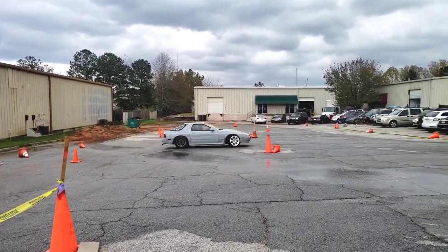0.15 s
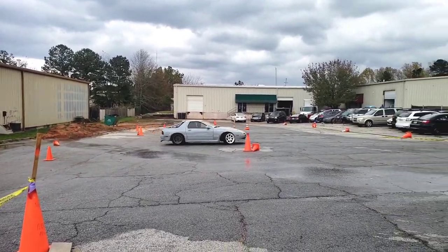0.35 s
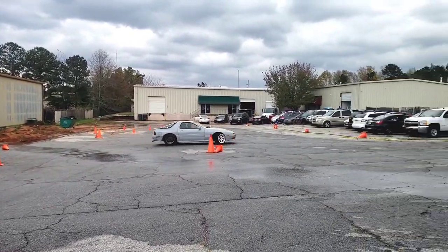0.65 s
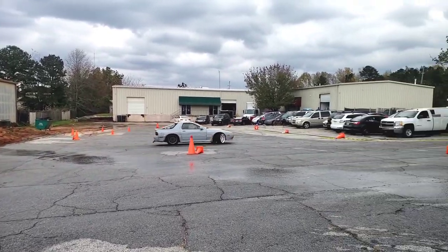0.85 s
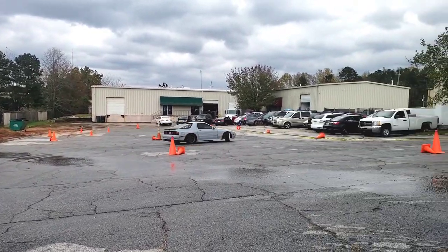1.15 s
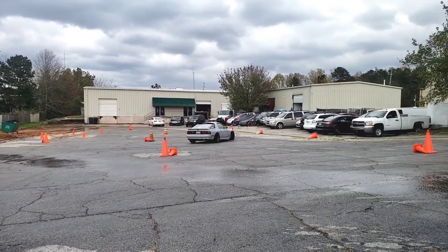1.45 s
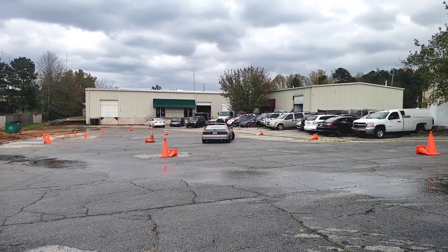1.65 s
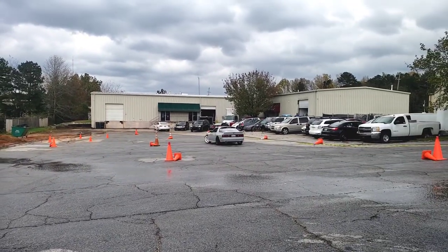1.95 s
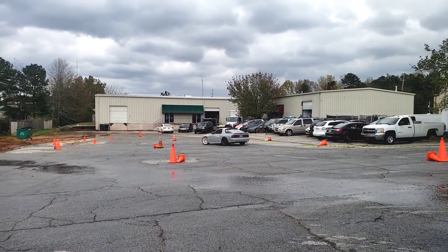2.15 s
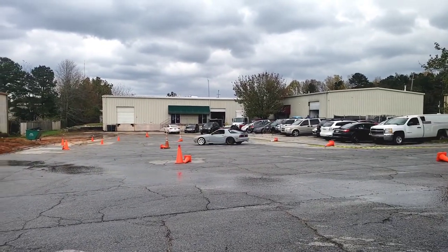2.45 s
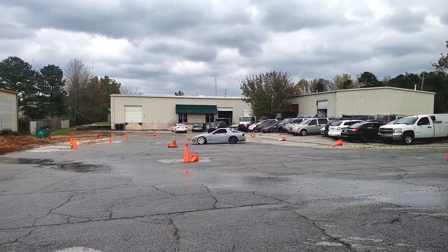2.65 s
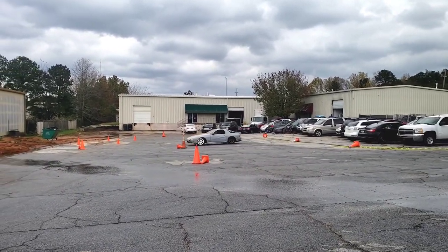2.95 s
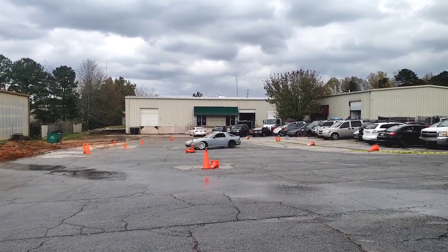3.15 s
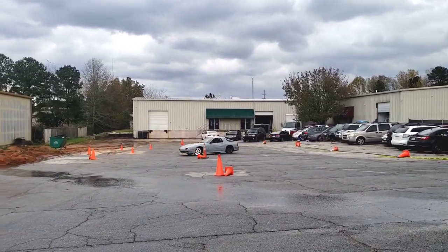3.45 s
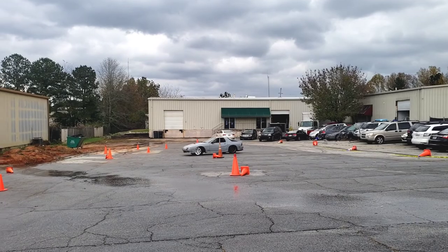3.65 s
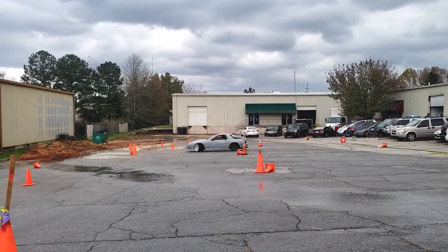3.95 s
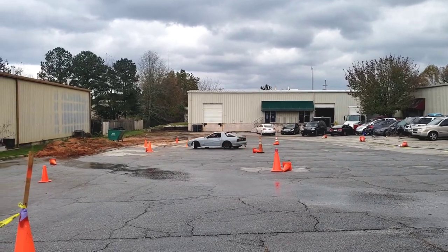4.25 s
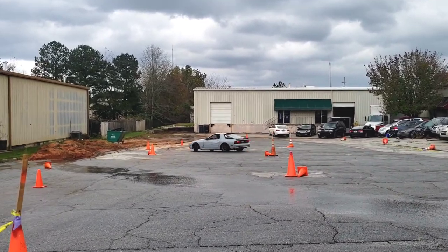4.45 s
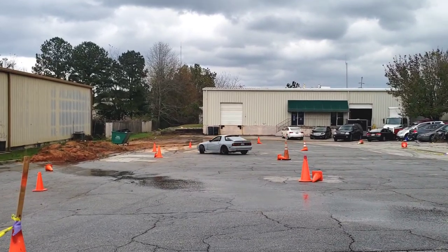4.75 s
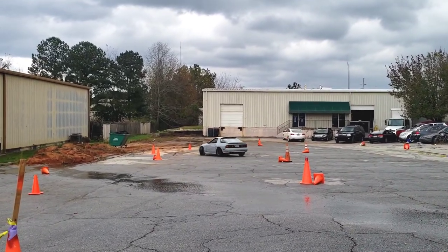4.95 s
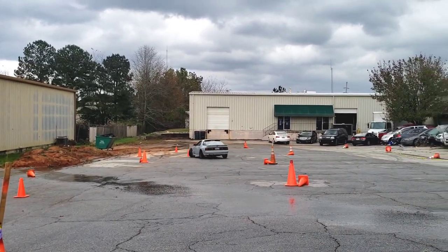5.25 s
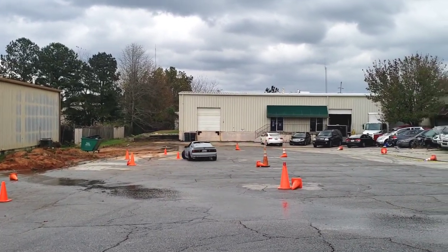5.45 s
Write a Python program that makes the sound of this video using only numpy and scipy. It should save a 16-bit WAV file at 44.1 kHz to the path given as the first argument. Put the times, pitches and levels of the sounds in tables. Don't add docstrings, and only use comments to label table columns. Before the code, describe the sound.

A rotary-engined car drifts around a damp lot, its buzzy, booming exhaust barking and dropping in pitch with each throttle stab, echoing off sheds.

```python
import sys
import numpy as np
from scipy import signal
from scipy.fft import rfft, irfft
from scipy.io import wavfile
from scipy.ndimage import uniform_filter1d

SR = 44100
rng = np.random.default_rng(int(sys.argv[2]) if len(sys.argv) > 2 else 0)


def pcm_store(signal):
    levels = np.round(np.clip(np.atleast_2d(signal), -1, 1) * 32767)
    wavfile.write(sys.argv[1], SR, levels.astype(np.int16).T)


def voltage_ratio(level):
    return 10 ** (np.asarray(level, float) / 20)


N = 246959
LEFT_RIGHT = np.array([[1], [-1]])


def in_time(rows):
    s, *columns = np.transpose(rows)
    return [np.interp(np.arange(N) / SR, s, c) for c in columns]


def at_hz(points):
    hz, value = np.transpose(points)
    return np.interp(np.log(np.fft.rfftfreq(N, 1 / SR) + 1), np.log(hz + 1), value)


def evened(x, span_s=0.0572):
    power = uniform_filter1d(np.mean(np.atleast_2d(x) ** 2, axis=0), int(span_s * SR))
    return x / np.sqrt(np.maximum(power, 0) + 1e-12)


def cut(x, hz, kind, order=2):
    sos = signal.butter(order, np.clip(hz, 10, .45 * SR), kind, fs=SR, output="sos")
    return signal.sosfilt(sos, x)


def resonate(x, modes):
    out = 0
    for k, (hz, width_hz, db) in enumerate(modes):
        r = np.exp(-np.pi * width_hz / SR)
        poles = [1, -2 * r * np.cos(2 * np.pi * hz / SR), r * r]
        zeros = [(1 - r * r) / 2, 0, (r * r - 1) / 2]
        out = out + (-1) ** k * voltage_ratio(db) * signal.lfilter(zeros, poles, x)
    return out


def delayed(x, s):
    return np.interp(np.arange(N) - s * SR, np.arange(N), x)


# f/Hz, likeness/0-1
PORT_LIKENESS = [(100, 0.22), (640, 0.42), (1400, 0.31), (3000, 0.11), (7000, 0.083), (15000, 0.083)]


def stereo_noise(spectrum):
    mid, side = rfft(rng.standard_normal((2, N))) * voltage_ratio(at_hz(spectrum))
    alike = np.clip(at_hz(PORT_LIKENESS), 0, 1)
    x = irfft(np.sqrt(1 + alike) * mid + np.sqrt(1 - alike) * side * LEFT_RIGHT, N)
    return x / np.sqrt(np.mean(x ** 2))


# t/s, level/dB
BREEZE_DB = [
    (0, -76),
    (2.9, -64),
    (3.3, -54),
    (3.8, -52),
    (4.55, -51),
    (5.1, -56),
    (5.6, -36),
]


def wind():
    mid, side = cut(cut(rng.standard_normal((2, N)), 55, "low", order=4), 30, "high")
    return voltage_ratio(in_time(BREEZE_DB)[0]) * evened(mid + 0.67 * side * LEFT_RIGHT, 0.45)


# open t/s, held/s, boom level/dB at 100 firings per s,
# bark level/dB on opening, bark level/dB on shutting
PEDAL_STABS = [
    (0.171, 0.25, -23.5, -28.5, -26.5),
    (0.622, 0.52, -25, -42.5, -24.5),
    (1.636, 0.508, -17.5, -22.5, -26.5),
    (2.274, 0.28, -18.5, -22.5, -25),
    (3.247, 0.627, -18, -42, -25.5),
    (3.93, 0.041, -21.5, -65, -31.5),
    (4.77, .22, -22.5, -58, -44.5),
    (5.199, 0.55, -16.5, -42.5, -31),
]
BOOM_SHUT_S, BARK_SHUT_S, COAST_DULLS_S = 0.039, .07, 0.2


def pedal(shut_s):
    open_s = .012
    t = np.arange(N) / SR
    loads = []
    for on, held, *_ in PEDAL_STABS:
        opening = (t - on) / open_s
        release = 1 - (t - on - held) / shut_s
        loads.append(np.clip(np.minimum(opening, release), 0, 1))
    return np.array(loads)


# f/Hz, level/dB per Hz
YARD_SPECTRUM = [(150, -47), (300, -18), (470, -16.5), (850, -12), (1500, -15.5), (2610, -16.5),
                 (2910, -29.5), (3820, -24.5), (6210, -34), (7310, -27), (9000, -34.5), (14800, -35.5),
                 (16000, -38)]
# t/s, level/dB
TYRE_DB = [
    (0, -39),
    (1.1, -40.5),
    (1.6, -42),
    (3.1, -46),
    (3.7, -50),
    (4.4, -42.5),
    (4.9, -50),
    (5.6, -49.5),
]
# t/s, level/dB, length/s
GRIT_SCUFFS = [
    (4.165, -43.5, 0.02),
    (4.225, -47, 0.0091),
]
# t/s, level/dB
SQUEAL_DB = [
    (2.85, -44),
    (2.95, -44),
    (3.08, -39),
    (3.2, -41.5),
    (3.3, -48),
    (4.2, -48),
    (4.55, -82),
]
# f/Hz, width/Hz, level/dB
TREAD_MODES = [(815, 140, -2), (1590, 470, -7.5)]


def tyres():
    spin_db, flutter_db = 4.5, 1.6
    flutter = cut(rng.standard_normal(N), 12.2, "low")
    spin = uniform_filter1d(pedal(BARK_SHUT_S).max(axis=0), SR // 10)
    level_db = in_time(TYRE_DB)[0] + spin_db * spin + flutter_db * flutter / flutter.std()
    hiss = stereo_noise(YARD_SPECTRUM) * voltage_ratio(level_db)
    t = np.arange(N) / SR
    grit = cut(rng.standard_normal((2, N)) ** 3 / 4, [900, 7000], "band", order=1)
    scuffs = sum(voltage_ratio(db) * np.exp(-((t - s) / length_s - 1) ** 2) for s, db, length_s in GRIT_SCUFFS)
    squeal = voltage_ratio(in_time(SQUEAL_DB)[0]) * evened(resonate(rng.standard_normal(N), TREAD_MODES))
    return hiss + grit * scuffs + squeal


def firings(firing_hz, lag, jitter, mismatch_db, spread_db):
    phase = np.cumsum(firing_hz) / SR
    count = np.arange(1, int(phase[-1]))
    chance = rng.standard_normal((2000, 2))[:len(count)]
    at = np.interp(count, phase, np.arange(N))
    i, second = at.astype(int), count % 2
    late_turns = lag[i] * second + jitter[i] * chance[:, 0]
    at = np.clip(at + late_turns * 2 * SR / firing_hz[i], 0, N - 2)
    size = voltage_ratio(-mismatch_db[i] * second + spread_db * chance[:, 1])
    i = at.astype(int)
    return np.bincount(i, size * (1 - at + i), N) + np.bincount(i + 1, size * (at - i), N) + 1e-18


# f/Hz, width/Hz, level/dB
PIPE_MODES = [(94.8, 84.3, 33), (326, 140, -23)]
SILENCER_MODES = [(780, 83, 11), (893, 34, 1.5)]
# t/s, shaft turns per s, level/dB
LATE_REV_TRACK = [
    (0, 68, -26),
    (.12, 90.5, -35),
    (.25, 77, -30),
    (.32, 120, -40),
    (.4, 69, -89),
]


def late_rev():
    shaft_hz, level_db = in_time(LATE_REV_TRACK)
    pulses = firings(2 * shaft_hz, np.full(N, .01), np.full(N, .006), np.ones(N), spread_db=1.5)
    dull = resonate(pulses, PIPE_MODES) + 0.11 * resonate(pulses, SILENCER_MODES)
    return voltage_ratio(level_db) * evened(dull)


# t/s, exhaust aimed at sheds level/dB, sharp edge aimed at listener level/dB,
# deep silencer ring level/dB
CAR_AIM = [(0, 8.5, 16, 4), (.35, -6, 4.5, -43), (.75, 1.5, 6, -22), (1.08, 2, 13.5, -16),
           (1.4, -1.5, -41, -23), (1.65, 4.5, -10, -3), (1.76, -3, 3.5, -8.5), (2.1, -5, -17, 0),
           (2.35, -9.5, 2.5, -1), (2.9, -3, 14.5, -54), (3.27, 5.5, 8.5, 9), (3.5, 1, -14, 32),
           (3.74, -0.5, 5, -3), (3.88, -4, 4, -27), (4.25, -2, -32, -20), (4.65, 5, -22, -1),
           (4.9, 2.5, -25, 35), (5.15, 7.5, -32, 44), (5.6, 1.5, -40, 35)]
# delay/s, level/dB, left-right/dB
LONG_SHED = (.272, -10, 2)
# delay/s, level/dB, left-right/dB
SHED_WALLS = [(0.084, -18, 1.5), (0.163, -19.5, -16), (0.389, -21, -10.5), (0.552, -21, 0)]


def sheds(x):
    t = np.arange(int(1.2 * SR)) / SR
    mid, side = rng.standard_normal((2, len(t)))
    scatter = 2.8 * mid + 0.73 * side * LEFT_RIGHT
    response = voltage_ratio(-49 - 60 * t / 1.2) * (t > .03) * scatter
    for delay_s, db, pan_db in [LONG_SHED, *SHED_WALLS]:
        response[:, int(delay_s * SR)] += voltage_ratio(db + pan_db / 2 * np.array([1, -1]))
    aimed = cut(x * voltage_ratio(in_time(CAR_AIM)[0]), 820, "low")
    return signal.fftconvolve(aimed[None], response, axes=1)[:, :N]


# t/s, firings per s, flattening of the run that follows
ENGINE_SPEED = [(0, 166, .05), (.2, 147.5, .3), (.375, 157, .05), (.62, 126, -.3), (1.14, 159, 2),
                (1.63, 91, .8), (2.09, 141.5, .9), (2.285, 109, 1.2), (2.565, 143, 1.1), (3.25, 64.5, 1.2),
                (3.86, 107.5, 1.4), (4.55, 60, -1), (4.7, 62, .7), (5.02, 80, .5), (5.2, 66, 1.8),
                (5.6, 98.5, 1)]


def speed():
    throttle_lag_s = .07
    s, hz, bend = np.transpose(ENGINE_SPEED)
    t = np.arange(N) / SR
    k = np.clip(np.searchsorted(s, t, "right") - 1, 0, len(s) - 2)
    since, span = t - s[k], s[k + 1] - s[k]
    slow = throttle_lag_s * (hz[k + 1] < hz[k]) + 1e-6
    done = (since + slow * np.expm1(-since / slow)) / (span + slow * np.expm1(-span / slow))
    return hz[k] + (hz[k + 1] - hz[k]) * np.expm1(-bend[k] * done) / np.expm1(-bend[k])


# t/s, extra lag/turns, extra mismatch/dB
FOULED_ROTOR = [
    (3.85, 0, 0),
    (4.15, .055, 6),
    (4.85, .11, 8),
    (5.4, .12, 7),
    (5.47, .012, 7.5),
]


def lumpiness():
    coast = 1 - pedal(BARK_SHUT_S).max(axis=0)
    foul_lag, foul_db = in_time(FOULED_ROTOR)
    slow = np.clip((92 - speed()) / 25, 0, 1)
    lag = .005 + .03 * coast + foul_lag
    mismatch_db = .8 + 1.2 * coast + foul_db
    jitter = .0015 + .007 * coast + .01 * slow
    return lag, mismatch_db, jitter


# t/s, loss/dB, length/s
NOTE_DIPS = [(0.105, 9.5, 0.083), (.39, 5.5, 0.039), (0.523, 21, 0.016), (0.868, 7, 0.0089),
             (0.996, -1, 0.023), (1.296, 2.5, .05), (1.58, 2, 0.032), (1.853, -0.5, 0.023),
             (2.156, 13, 0.039), (2.67, 2, 0.016), (2.95, -4, 0.026), (3.07, -2.5, 0.023),
             (3.23, -3, 0.057), (3.394, 6.5, 0.058), (3.719, -0.5, 0.0081), (4.043, 9, 0.015),
             (4.54, -4, 0.069), (5.107, 15, 0.018), (5.267, 8, 0.037)]
# full t/s, build/s, held/s, rasp level/dB, spit level/dB
GAS_BLASTS = [(-.05, .12, 0.041, -60, -30), (.27, 0.1, 0.076, -50, -31.5), (.8, .3, 0.13, -58.5, -45),
              (1.0, 0.23, .11, -53, -30), (1.72, 0.06, 0.16, -41, -34), (1.802, 0.027, .004, -50, -27),
              (1.95, 0.14, 0.14, -45.5, -35), (2.314, 0.043, 0.24, -30.5, -27),
              (3.8, 0.19, 0.017, -42.5, -41.5), (4.18, 0.022, .004, -44, -60), (5.32, 0.4, .3, -60, -50.5)]


def loudness():
    coast_boom_db, coast_bark_db = -27.5, -56.5
    boom_db_per_octave, bark_db_per_octave, spit_db_per_octave = 10.5, 22.5, 11
    still_rasp_db, still_spit_db = -56.0, -63
    blast_rise_db, blast_fall_share = 23.5, 1.43
    t, octaves = np.arange(N) / SR, np.log2(speed() / 100)
    dip = sum(db * np.exp(-((t - s) / length_s) ** 2) for s, db, length_s in NOTE_DIPS)
    boom = coast_boom_db
    for load, row in zip(pedal(BOOM_SHUT_S), PEDAL_STABS):
        boom = boom + load * (row[2] - coast_boom_db)
    coast = coast_bark_db + bark_db_per_octave * octaves
    bark = coast
    for load, (on, held, _, open_db, shut_db) in zip(pedal(BARK_SHUT_S), PEDAL_STABS):
        bark = bark + load * (np.interp(t - on, [0, held], [open_db, shut_db]) - coast)
    rasp = np.full(N, still_rasp_db)
    spit = still_spit_db + spit_db_per_octave * octaves
    for full, build, held, rasp_db, spit_db in GAS_BLASTS:
        away_s = np.maximum(full - t, (t - full - held) / blast_fall_share)
        short_db = blast_rise_db / build * np.maximum(away_s, 0)
        rasp = np.maximum(rasp, rasp_db - short_db)
        spit = np.maximum(spit, spit_db - short_db)
    return boom + boom_db_per_octave * octaves - dip, bark - dip, rasp, spit


def puffs(pulses, decay_ms):
    r = np.exp(-1000 / (decay_ms * SR))
    return cut(signal.lfilter([1], [1, -r], pulses), 670, "low", order=1)


def pipe_boom(timing, mismatch_db):
    thumps = firings(*timing, .12 * mismatch_db, spread_db=.3)
    suction_db = np.minimum(in_time(CAR_AIM)[2], 19) + 1
    boom = resonate(thumps, PIPE_MODES) - voltage_ratio(suction_db) * resonate(thumps, [(309, 70, 0)])
    load = pedal(COAST_DULLS_S).max(axis=0)
    loaded = cut(boom, 330, "low", order=6)
    coasting = cut(boom, 187, "low", order=3)
    boom = load * loaded + (1 - load) * coasting
    return evened(delayed(cut(boom, 50, "high", order=4), -.0022))


# f/Hz, width/Hz, level/dB
DEEP_RING_MODES = [(685.7, 88, 16), (521.5, 51, -38)]
# f/Hz, width/Hz, level/dB
PANEL_MODES = [(343, 99, -21), (441, 54, -5)]


def silencer_bark(timing, mismatch_db):
    _, edge_db, deep_db = in_time(CAR_AIM)
    pulses = firings(*timing, mismatch_db, spread_db=-0.5)
    turbulence = .008 * puffs(pulses, 3.0) * rng.standard_normal(N)
    blown = resonate(pulses + turbulence, [(720, 600, 0)])
    ring = resonate(blown, SILENCER_MODES) + voltage_ratio(deep_db) * resonate(blown, DEEP_RING_MODES)
    edge = cut(cut(pulses, 1130, "low"), 476, "high") + resonate(pulses, [(1510, 430, -33.5)])
    panels = resonate(resonate(pulses, PANEL_MODES), PANEL_MODES[1:])
    return evened(ring) + voltage_ratio(edge_db - 11.0) * (evened(edge) + .5 * evened(panels))


# f/Hz, width/Hz, level/dB
TAILPIPE_MODES = [(2420, 160, -8), (3090, 105, 3.5), (3810, 105, 1.5), (4450, 200, -11), (5470, 250, -19)]
# f/Hz, level/dB per Hz
SPIT_SPECTRUM = [(3240, 4.5), (5500, -4.5), (5880, -8.5), (7190, 1), (8370, -6), (9880, -0.5),
                 (14300, -1.5), (16000, -6)]


def tailpipe_hiss(timing, mismatch_db, rasp_db, spit_db):
    cracks = firings(*timing, mismatch_db + 3, spread_db=1.4)
    steady = np.clip((-42 - rasp_db) / 25, 0, 1)
    mid, side = rng.standard_normal((2, N))
    flow = (puffs(cracks, 1.6) + .1 + steady) * (mid + .5 * side * LEFT_RIGHT)
    piped = resonate(flow + 5 * cracks, TAILPIPE_MODES)
    rasp = cut(resonate(piped, [(3200, 8400, 0)]), 1300, "high")
    gusts = puffs(firings(*timing, mismatch_db + 4, spread_db=4.5), 1.0) + .12 + steady
    spit = evened(gusts * stereo_noise(SPIT_SPECTRUM), .1)
    return voltage_ratio(rasp_db) * evened(rasp) + voltage_ratio(spit_db) * spit


def exhaust():
    boom_db, bark_db, rasp_db, spit_db = loudness()
    lag, mismatch_db, jitter = lumpiness()
    timing = speed(), lag, jitter
    boom = voltage_ratio(boom_db) * pipe_boom(timing, mismatch_db)
    bark = voltage_ratio(bark_db) * silencer_bark(timing, mismatch_db)
    return boom, bark, tailpipe_hiss(timing, mismatch_db, rasp_db, spit_db)


def scene():
    boom, bark, hiss = exhaust()
    tone = boom + bark
    direct = tone + 0.15 * delayed(tone, 0.00233) * LEFT_RIGHT
    thin_boom = voltage_ratio(3.0) * cut(boom, 204, "high", order=1)
    echoes = sheds(thin_boom + bark + hiss[0])
    return direct + hiss + echoes + late_rev() + tyres() + wind()


def band_limit(x):
    return signal.sosfilt(signal.butter(12, 16470, fs=SR, output="sos"), x)


# f/Hz, left-right/dB
PORT_LEAN = [(60, -5), (110, 0.5), (200, 2), (380, 2), (700, 2.5), (1290, 5), (2380, -3), (4400, 7),
             (8120, 5.5), (15000, -5.5)]
# f/Hz, left lead/rad
PORT_LEAD = [(300, 0), (2070, -.3), (2670, 0), (2930, 1.5), (3880, .3), (4310, -.6), (5340, 5), (6630, 5.6),
             (8530, 3.2), (10200, -2.8), (12700, -5.5), (16000, -4)]


def record(dry):
    lean = voltage_ratio(at_hz(PORT_LEAN) / 2 * LEFT_RIGHT)
    lead = np.exp(.5j * at_hz(PORT_LEAD) * LEFT_RIGHT)
    x = irfft(rfft(dry) * lean * lead, N)
    soft = 1.5 * np.tanh(x / 1.5)
    mix = signal.sosfilt(signal.cheby2(12, 50, 16500, fs=SR, output="sos"), soft)
    return band_limit(mix)


dry = scene()
out = record(dry)
pcm_store(out)
```